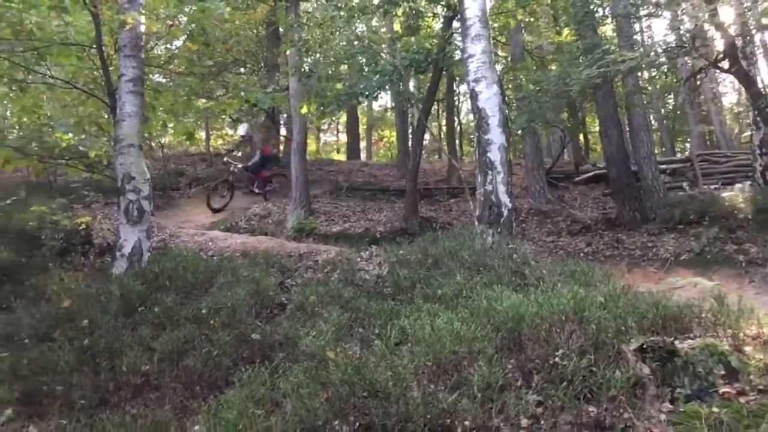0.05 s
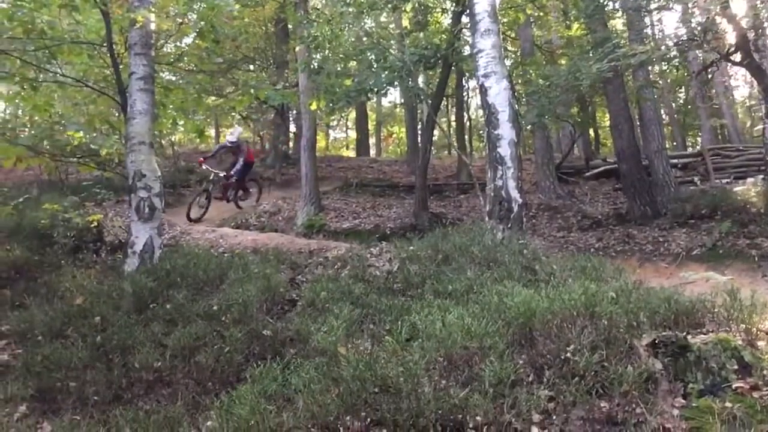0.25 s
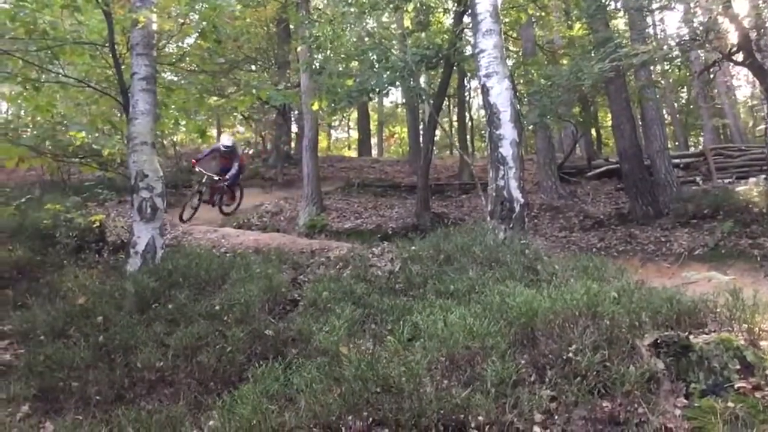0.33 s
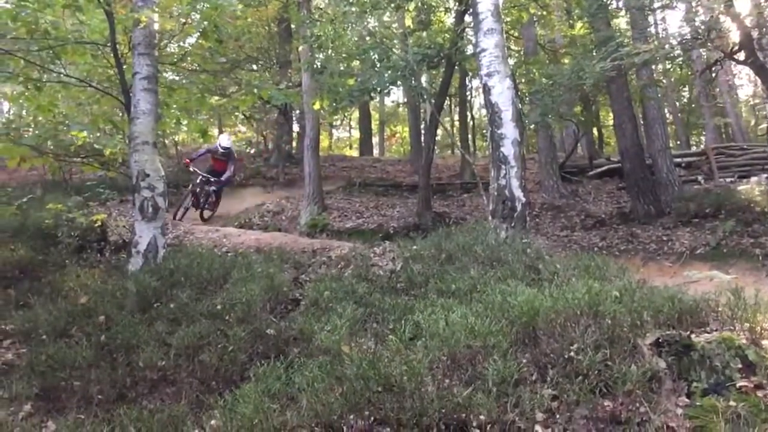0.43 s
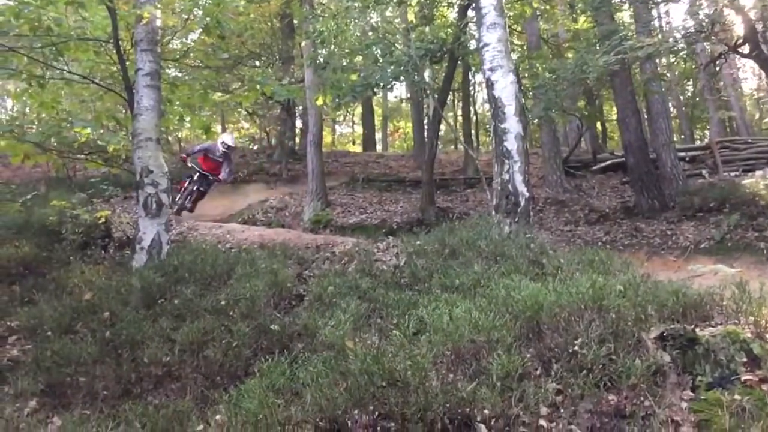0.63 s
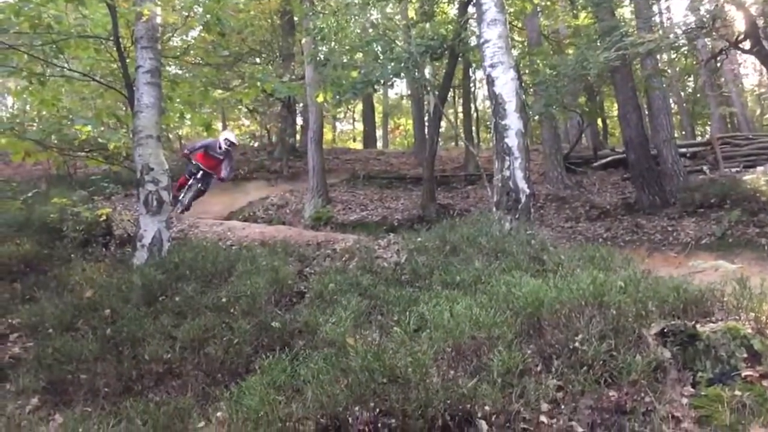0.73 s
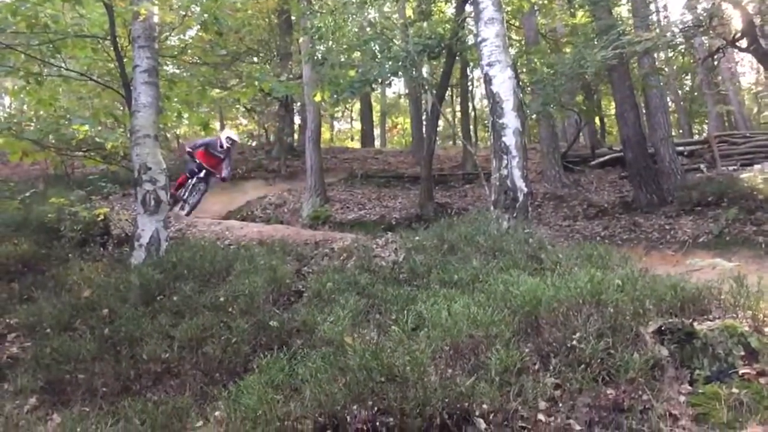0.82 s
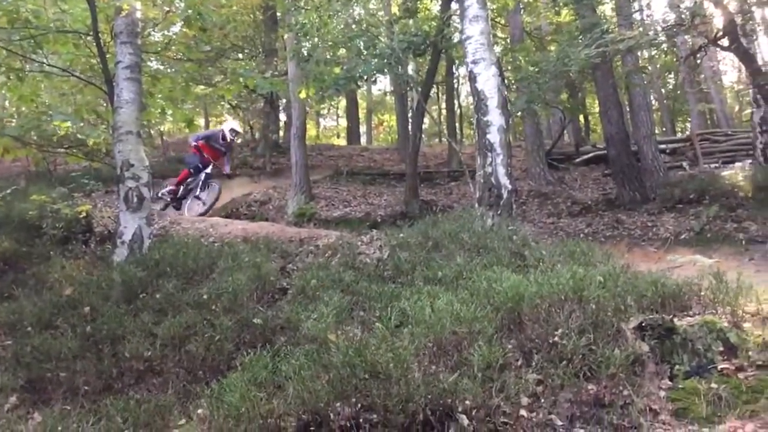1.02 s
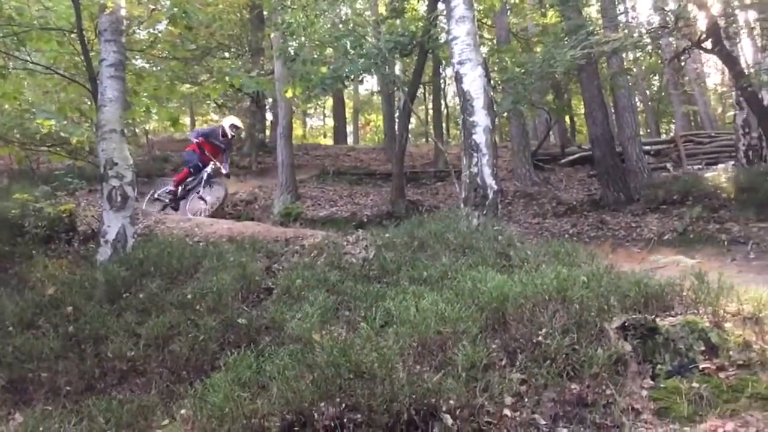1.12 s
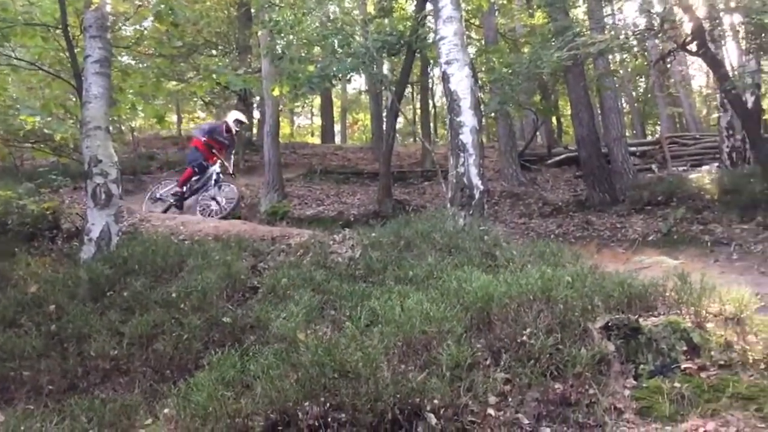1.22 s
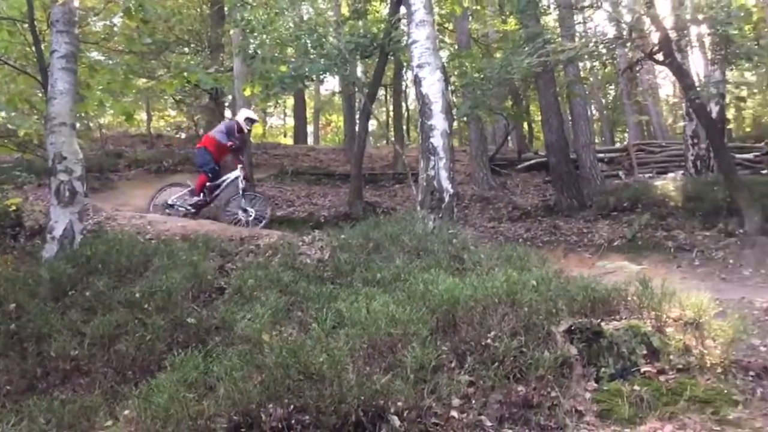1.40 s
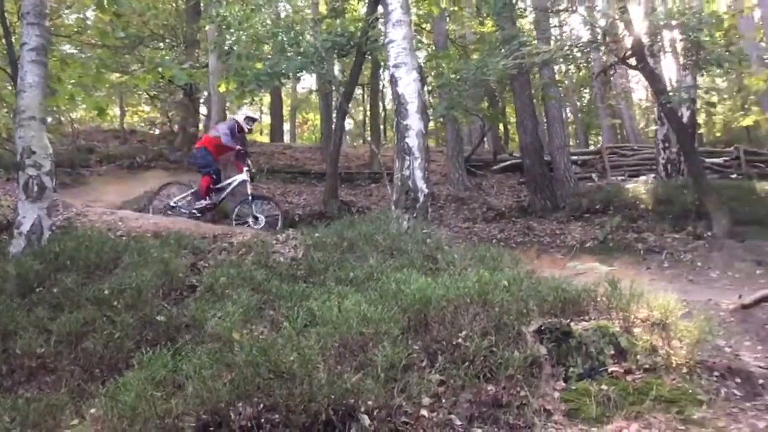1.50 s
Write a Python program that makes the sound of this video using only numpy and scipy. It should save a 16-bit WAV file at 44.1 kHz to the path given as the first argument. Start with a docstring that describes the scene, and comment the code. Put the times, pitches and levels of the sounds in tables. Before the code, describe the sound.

Mountain bike tires scrub through a dirt turn, with clattering and then freewheel ticking.

```python
"""In the woods, some way off, a mountain bike rounds a banked dirt turn.
Its knobby tires hum, scrub through the dirt and throw grit. The chain and frame clatter and knock
as the bike is pressed into the turn, then it rolls out with the freewheel ticking.
Tree trunks scatter the sound, and a low rumble of air lies underneath."""
import sys
import numpy as np
from scipy import signal
from scipy.fft import rfft, irfft, next_fast_len
from scipy.io import wavfile
from scipy.ndimage import map_coordinates

SR = 44100
rng = np.random.default_rng(int(sys.argv[2]) if len(sys.argv) > 2 else 0)


def master_out(mix):
    """Clip the mix to full scale and print it as 16-bit PCM to the path in sys.argv[1]."""
    frames = np.transpose(np.atleast_2d(mix))
    ceiling = np.clip(frames, -1, 1)
    pcm = np.round(ceiling * 32767).astype(np.int16)
    wavfile.write(sys.argv[1], SR, pcm)


N = 68355


def amp(db):
    """Turn decibels into a number to multiply by."""
    return 10 ** (np.asarray(db) / 20)


def unit(x):
    """Scale a sound to an average strength (rms) of 1."""
    return x / np.sqrt(np.mean(x ** 2) + 1e-20)


def along(points, hz):
    """Read between the rows of a (frequency, value) table, with octaves evenly spaced."""
    freqs, values = np.transpose(points)
    return np.interp(np.log(hz + 1), np.log(freqs + 1), values)


def curves(rows):
    """Join the rows of a time table with straight lines: one curve per column after the time."""
    times, *columns = np.transpose(rows)
    return [np.interp(np.arange(N) / SR, times, column) for column in columns]


def wobble(per_s):
    """A smooth curve through per_s random values a second."""
    return map_coordinates(rng.standard_normal(N // 8), [np.arange(N) * per_s / SR], mode="wrap")


def filtered(x, response):
    """Turn each frequency up or down by the factor response(hz)."""
    size = next_fast_len(N + SR // 2)
    return irfft(rfft(x, size) * response(np.fft.rfftfreq(size, 1 / SR)), size)[:N]


def coloured(x, tone):
    """Give a sound the bass and treble of a tone table, at strength 1."""
    return unit(filtered(x, lambda hz: amp(along(tone, hz))))


def noise(tone):
    """A steady rush with the given tone."""
    return coloured(rng.standard_normal(N), tone)


def grains(per_s, spread_db):
    """Tiny impacts at random moments, a few much stronger than the rest."""
    sizes = amp(spread_db * np.minimum(rng.exponential(size=N), 4))
    return unit((rng.random(N) < per_s / SR) * sizes * rng.choice([-1, 1], N))


def since(start):
    """Seconds since start, zero before it."""
    return np.maximum(np.arange(N) / SR - start, 0)


def sine(start, hz):
    """A pure note that begins at start."""
    return np.sin(2 * np.pi * hz * since(start))


def strike(start, rise_s, fade_s):
    """The loudness of a hit: a quick rise, and a fall of 60 dB every fade_s."""
    t = since(start)
    return (1 - np.exp(-t / rise_s)) * amp(-60 * t / fade_s)


# tone of the air (frequency [Hz], level [dB])
AIR_TONE = [(20, -22), (35, -7), (60, 2.5), (110, -4), (200, -13), (400, -14.5), (1000, -33), (3000, -36),
            (5000, -57), (8000, -24.5), (11000, -30.5), (15500, -37)]
def air():
    """The air rumbles steadily, with a faint hiss on top."""
    return amp(-58.5) * noise(AIR_TONE)


# how long the echo lasts (frequency [Hz], time to fade by 60 dB [s])
ECHO_FADE = [(150, 0.9), (1500, 0.22), (5000, 0.093), (14000, 0.42)]
def trunk_echo(x):
    """Trunks scatter the sound into a soft echo; the bass lingers longest."""
    hz, t, bands = signal.stft(rng.standard_normal(SR // 2), SR, nperseg=256)
    fade = amp(-60 * t / along(ECHO_FADE, hz)[:, None])
    tail = signal.istft(bands * fade, SR, nperseg=256)[1]
    return signal.fftconvolve(x, tail / np.linalg.norm(tail))[:N]


# thumps in the ground (time [s], pitch [Hz], level [dB])
THUMPS = [(0.029, 102.7, -38), (.588, 101, -42.5), (0.631, 60, -34.5), (1.222, 63.7, -42)]
def ground_thumps():
    """Dull thumps come through the ground, each a short bass note."""
    return sum(amp(db) * strike(s, rise_s=.006, fade_s=.095) * sine(s, hz) for s, hz, db in THUMPS)


# hum of the tire knobs (time [s], pitch [Hz], level [dB])
TREAD_HUM = [(.14, 153.6, -80), (.22, 151.6, -56.5), (.3, 148.7, -61.5), (.4, 144, -54.5),
             (.46, 152.6, -65), (.53, 157.3, -54.5), (.7, 150, -72.5), (1.2, 140.3, -79),
             (1.35, 151.4, -59.5), (1.45, 142, -59.5), (1.55, 137.5, -74.5)]
def tread_hum():
    """The rows of knobs drum an unsteady hum on the hard ground."""
    hz, db = curves(TREAD_HUM)
    wavering_hz = hz * (1 + .09 * wobble(per_s=90))
    phase = 2 * np.pi * np.cumsum(wavering_hz) / SR
    return np.sqrt(2) * amp(db + 2.5 * wobble(per_s=50.16)) * np.sin(phase)


# loudness of the slack chain (time [s], level [dB])
RATTLE_LEVEL = [(.25, -85), (.3, -61), (.42, -70), (.49, -61), (.56, -53), (.65, -59), (.72, -68),
                (.8, -87)]
# tone of its links (frequency [Hz], level [dB])
RATTLE_TONE = [(2000, -18), (4000, -7), (6300, -7), (9000, -3), (10500, -16), (12500, -6), (15500, -2)]
def chain_rattle(hits_per_s=110):
    """Loose links chatter over the rough stretch, a random run of dry little clicks."""
    hits = (rng.random(N) < hits_per_s / SR) * rng.uniform(.5, 1, N)
    one_hit = strike(0, rise_s=.00055, fade_s=.014)
    chatter = unit(signal.fftconvolve(hits, one_hit)[:N])
    return amp(curves(RATTLE_LEVEL)[0]) * chatter * noise(RATTLE_TONE)


# single clicks of the chain (time [s], level [dB], pitch [Hz])
CLICKS = [(0.0204, -49, 9300), (0.055, -55, 8200), (.074, -59, 9300), (.183, -49.5, 9300),
          (0.301, -51, 9700), (.332, -54, 10000), (0.681, -45.5, 11500)]
# tone of their snap (frequency [Hz], level [dB])
CLICK_TONE = [(3000, -24), (7000, -2), (9300, 11), (12000, -4), (15500, -1)]
def chain_clicks():
    """Stray links click, each a dry snap with a tiny metal ping."""
    snap = noise(CLICK_TONE)
    return sum(amp(db) * strike(s, rise_s=.00055, fade_s=.02) * (snap + amp(-4) * sine(s, hz))
               for s, db, hz in CLICKS)


# speed of the freewheel's ticking (time [s], rate [ticks/s])
TICK_RATE = [(1.2035, 62), (1.39, 62), (1.42, 70), (1.49, 79), (1.515, 102)]
# loudness of the ticks (time [s], level [dB])
TICK_LEVEL = [(1.2, -49.5), (1.29, -49.5), (1.45, -49), (1.54, -49)]
# tone of a tick (frequency [Hz], level [dB])
TICK_TONE = [(1500, -27), (3200, -26), (4700, -5), (6000, 0.5), (9500, 1.5), (10500, 0.5), (13000, 2),
             (15500, -2)]
# where the wheel's hub rings (frequency [Hz], width [Hz], level [dB])
HUB_RINGS = [(3130, 250, -6), (8060, 300, 1), (9046, 240, -8), (9560, 210, -4)]
def freewheel(jitter_s=.0008, scatter_db=1.1, rise_s=.0012):
    """As the rider coasts, small catches tick ever faster over teeth; each tick rings the hub."""
    def hub_peaks(f):
        return sum(amp(db) / (1 + (2 * (f - hz) / width) ** 2) for hz, width, db in HUB_RINGS)

    rate, level = curves(TICK_RATE)[0], curves(TICK_LEVEL)[0]
    coasting = since(TICK_RATE[0][0]) > 0
    teeth_passed = np.ceil(np.cumsum(rate * coasting) / SR)
    ticks = [(i / SR + jitter_s * rng.normal(), level[i] + scatter_db * rng.normal())
             for i in np.flatnonzero(np.diff(teeth_passed))]
    snap = noise(TICK_TONE)
    hub = amp(-5) * unit(filtered(rng.standard_normal(N), hub_peaks))
    return sum(amp(db) * (snap * strike(s, rise_s, fade_s=.03) + hub * strike(s, rise_s, fade_s=.04))
               for s, db in ticks)


# jolts from bumps (time [s], level [dB])
JOLTS = [(.305, -41), (.331, -42), (.4585, -36), (.4995, -34), (.569, -33.5), (.589, -39), (.627, -39.5)]
# tone of the clatter (frequency [Hz], level [dB])
CLATTER_TONE = [(200, -45), (700, -1), (1200, -6), (2400, 2.5), (4000, -7), (7000, -17.5), (15000, -36)]
def clatter():
    """Chain and frame clatter over the bumps, one burst of noise for each."""
    return noise(CLATTER_TONE) * sum(amp(db) * strike(s, rise_s=.0006, fade_s=.11) for s, db in JOLTS)


# the hardest bumps (time [s], level [dB])
KNOCKS = [(.5895, -33), (.627, -38)]
# tone of their thud (frequency [Hz], level [dB])
THUD_TONE = [(150, -5), (350, -10.5), (520, -14), (680, -2), (820, 0.5), (1000, 0.5), (1270, -4.5),
             (1600, -8), (4000, -33)]
# notes the frame rings at (pitch [Hz], level [dB], time to fade by 60 dB [s])
FRAME_NOTES = [(365, -14, .14), (510, -2, .17), (678, 0, .16)]
def frame_knocks(rise_s=.0011):
    """The bike bottoms out with a hollow thud; its frame rings a little differently each time."""
    thud = noise(THUD_TONE)
    knocks = np.zeros(N)
    for s, db in KNOCKS:
        ring = sum(amp(note_db + rng.normal()) * sine(s, hz) * strike(s, rise_s, fade_s)
                   for hz, note_db, fade_s in FRAME_NOTES)
        knocks += amp(db) * (thud * strike(s, rise_s, fade_s=.077) + amp(-4.5) * ring)
    return knocks


# rasp of the tire's casing (time [s], pitch [Hz], level [dB])
RASP = [(.18, 890, -72), (.205, 883.7, -50.5), (.26, 920, -56), (.37, 1029, -52), (.45, 1028, -58),
        (.7, 980, -53), (.815, 986.6, -44.5), (.9, 986, -62), (1.01, 1016, -50.5), (1.12, 1010, -49.5),
        (1.2, 980, -58), (1.24, 985, -85)]
def tire_rasp(width_hz=170):
    """Slipping side knobs shake the tire: a narrow band of noise with a wandering pitch."""
    hz, db = curves(RASP)
    phase = 2 * np.pi * np.cumsum(hz) / SR
    return amp(db) * unit(wobble(width_hz) * np.sin(phase) + wobble(width_hz) * np.cos(phase))


# loudness of the tires' roar (time [s], level [dB])
ROAR_LEVEL = [(.1, -68.5), (.27, -57), (.43, -56), (.56, -54), (.66, -48), (.705, -58), (.76, -48),
              (.95, -58), (1.19, -55.5), (1.25, -68.5), (1.4, -67.5)]
# tone of packed earth (frequency [Hz], level [dB])
EARTH_TONE = [(60, -15), (180, -8), (280, -2), (420, -4.5), (560, -0.5), (700, -1), (950, -6.5),
              (1600, -17), (4000, -93)]
def earth_roar():
    """The tires roll over packed earth with a low roar."""
    return amp(curves(ROAR_LEVEL)[0]) * noise(EARTH_TONE)


# loudness of the flying grit (time [s], level [dB])
SPRAY_LEVEL = [(0, -75), (.13, -65), (.28, -50.5), (.335, -42.5), (.39, -50), (.45, -48.5), (.52, -47),
               (.548, -38), (.575, -37), (.61, -44.5), (.66, -47.5), (.75, -54), (.88, -49), (1.02, -44.5),
               (1.15, -45.5), (1.3, -64)]
# tone of the grit (frequency [Hz], level [dB])
GRIT_TONE = [(800, -55), (1900, 2.5), (2600, 3.5), (3200, 6), (4200, 4.5), (4900, -1), (6300, -0.5),
             (8000, -10.5), (10400, -16.5), (12000, -12.5), (15500, -29)]
def grit_spray():
    """The tires throw fine grit; thousands of tiny hits blur into a hiss."""
    return amp(curves(SPRAY_LEVEL)[0]) * coloured(grains(per_s=7000, spread_db=2.8), GRIT_TONE)


# loudness of the scrubbing (time [s], level [dB])
SCRUB_LEVEL = [(0, -56.5), (.035, -55), (.09, -65), (.15, -53.5), (.188, -53.5), (.205, -47), (.25, -44.5),
               (.31, -44.5), (.378, -42), (.4, -49), (.43, -42), (.453, -48.5), (.497, -60), (.555, -38.5),
               (.61, -52.5), (.685, -44), (.715, -39), (.772, -38), (.835, -40.5), (.93, -42), (1.005, -39),
               (1.15, -43.5), (1.205, -48), (1.235, -52.5), (1.33, -63), (1.55, -64.5)]
# tone of loose dirt (frequency [Hz], level [dB])
DIRT_TONE = [(200, -31), (560, -14.5), (680, -7.5), (780, -10), (950, 1.5), (1150, -1), (1320, 0.5),
             (1600, -2.5), (2100, 1), (3200, -4.5), (4200, -10), (4900, -12.5), (6300, -14.5), (8000, -22),
             (10500, -28), (15500, -32)]
# tone of small stones (frequency [Hz], level [dB])
STONE_TONE = [(700, -16), (1800, 6.5), (3500, -2), (6500, -9), (9000, -5), (15000, -48)]
def dirt_scrub(grain_share=.45):
    """Knobs scrub through loose dirt: a grainy rush dotted with snapping stones."""
    crunch = np.sqrt(grain_share) * grains(per_s=2500, spread_db=2.5)
    rush = np.sqrt(1 - grain_share) * rng.standard_normal(N)
    stones = amp(-16) * coloured(grains(per_s=150, spread_db=1.5), STONE_TONE)
    return amp(curves(SCRUB_LEVEL)[0]) * (coloured(crunch + rush, DIRT_TONE) + stones)


def scene():
    """The bike among the trees, over the rumble of the air."""
    tires = dirt_scrub() + earth_roar() + grit_spray()
    tires *= amp(.77 * wobble(per_s=60.1))  # the ground shakes the tires, so their level flutters
    tires += tire_rasp()
    bike = clatter() + frame_knocks() + chain_clicks() + freewheel() + chain_rattle()
    echo = trunk_echo(amp(-12.5) * tires + amp(-11) * bike)
    return (tires + bike + echo + tread_hum() + ground_thumps() + air())[None]


TOP_HZ = 15850
def record(dry):
    """Cut away the very highest treble."""
    return np.array([filtered(x, lambda hz: hz < TOP_HZ) for x in dry])


dry = scene()
out = record(dry)
master_out(out)
```